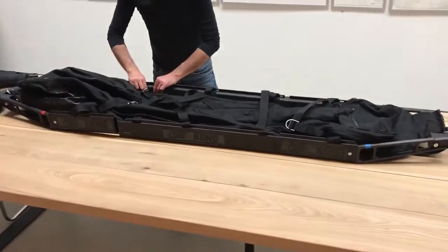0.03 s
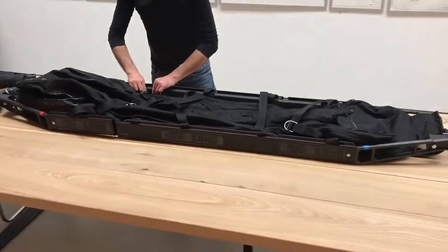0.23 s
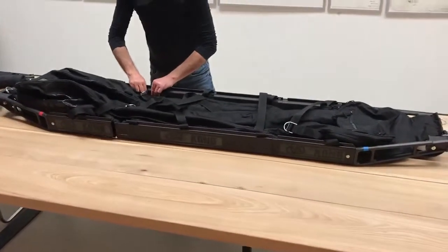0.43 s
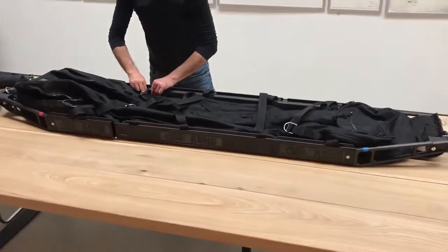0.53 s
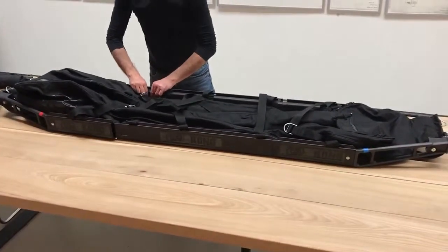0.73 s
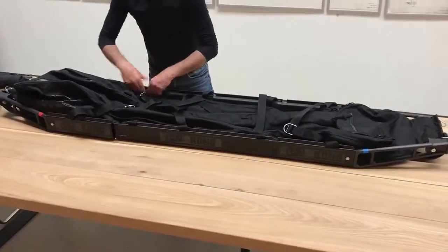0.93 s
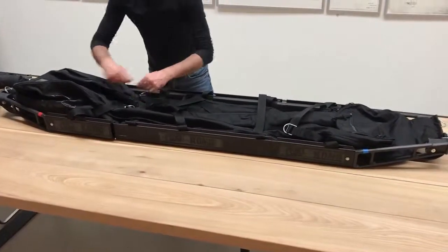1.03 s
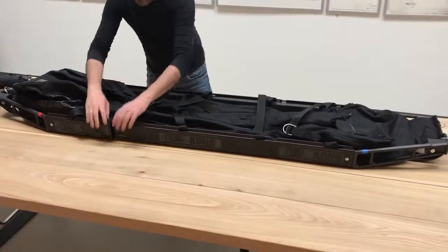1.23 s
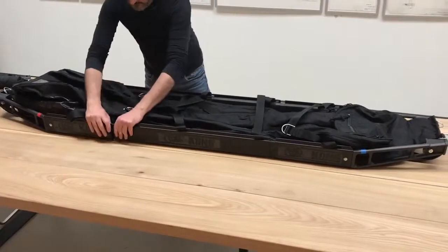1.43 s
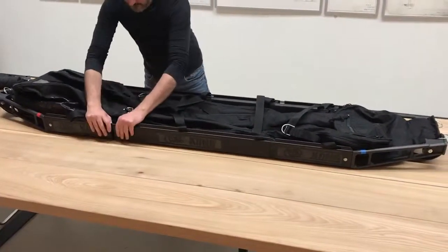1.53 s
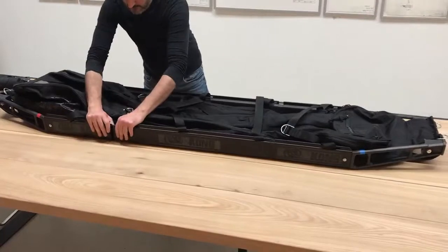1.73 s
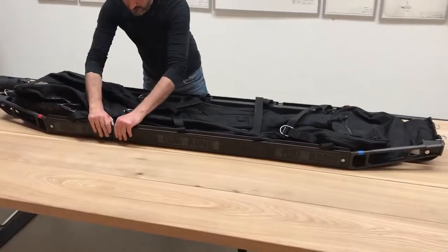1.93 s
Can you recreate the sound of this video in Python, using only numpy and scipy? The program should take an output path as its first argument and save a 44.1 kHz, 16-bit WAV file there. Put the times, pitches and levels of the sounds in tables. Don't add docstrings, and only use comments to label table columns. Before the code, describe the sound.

Metal and plastic stretcher parts knock and rattle on a tabletop in a bare, echoing room.

```python
import sys
import numpy as np
from scipy import signal
from scipy.io import wavfile

SR = 44100
rng = np.random.default_rng(int(sys.argv[2]) if len(sys.argv) > 2 else 0)


def transcribe(signal):
    frames = np.atleast_2d(signal).T
    limited = np.clip(frames, -1, 1)
    pcm = np.round(limited * 32767).astype(np.int16)
    wavfile.write(sys.argv[1], SR, pcm)


def boost(x):
    u = np.asarray(x, float) / 20
    return 10 ** u


N = 88200


def at_hz(points, hz):
    point_hz, value = np.transpose(points)
    return np.interp(np.log(np.maximum(hz, 1)), np.log(point_hz), value)


def rms_one(x):
    return x / np.sqrt(np.mean(x ** 2) + 1e-20)


def add(out, start_s, x):
    i = int(start_s * SR)
    out[i:i + len(x)] += x[:max(N - i, 0)]


def filtered(x, order, hz, kind):
    return signal.sosfilt(signal.butter(order, hz, kind, fs=SR, output="sos"), x)


def ring(clicks, hz, t60_s):
    r = boost(-60 / (t60_s * SR))
    w = 2 * np.pi * hz / SR
    return signal.lfilter([0, np.sin(w)], [1, -2 * r * np.cos(w), r * r], clicks + 1e-18)


def drift(rate_hz):
    step = 40
    r = np.exp(-2 * np.pi * rate_hz * step / SR)
    slow = signal.lfilter([1], [1, -2 * r, r * r], rng.standard_normal(N // step + 2002))
    slow = rms_one(slow[2000:])
    return np.interp(np.arange(N) / step, np.arange(len(slow)), slow)


def bands(white):
    edges = 22 * 2 ** np.arange(0, 9.9, 0.5)
    for k, (low, high) in enumerate(zip(edges, edges[1:])):
        yield np.sqrt(low * high), filtered(white[k % 2], 2, [low, high], "band")


def banded_noise(spectrum, patchy_db, rate_hz):
    together = drift(rate_hz)
    out = np.zeros(N)
    for hz, noise in bands(rng.standard_normal((2, N))):
        out += boost(at_hz(spectrum, hz) + patchy_db * (together + drift(7.9))) * noise
    return rms_one(out)


def chatter(length_s, per_s, size=4000):
    t = np.arange(size) / SR / max(length_s, 5e-4)
    spread_db = 3.0
    sizes = boost(spread_db * np.minimum(rng.exponential(1, size), 4)) * rng.choice([-1, 1], size)
    hits = (rng.random(size) < per_s / SR) | (t == 0)
    gather = np.minimum(0.7 + t / 0.076, 1)
    x = sizes * hits * gather * np.exp(-t ** 2)
    return x / np.sqrt(np.sum(x ** 2) + 1e-20)


# hz [Hz], level_db [dB]
FLOOR_SPECTRUM = [(15, -58), (25, -9), (48, 23.5), (170, -33), (301, 10), (384, -1), (545, -21), (714, -20),
                  (7500, -38), (10500, -50), (16000, -55)]


def room_tone():
    return boost(-44.5 - 4) * banded_noise(FLOOR_SPECTRUM, patchy_db=3.5, rate_hz=1.2)


# time_s [s], level_db [dB]
HAND_MOVES = [(0.0, -43.5), (0.15, -38.5), (0.32, -31.5), (0.451, -41), (0.62, -23), (0.75, -26.5),
              (0.8, -22), (0.96, -32), (1.39, -41), (1.63, -40), (1.81, -35.5), (2.0, -45)]
# hz [Hz], level_db [dB per Hz]
CLOTH_SPECTRUM = [(50, -1.5), (90, -3.5), (300, 2), (550, -6.5), (900, -8.5), (1500, -12), (4500, -26.5),
                  (16000, -48)]


def cloth():
    time_s, level_db = np.transpose(HAND_MOVES)
    motion_db = np.interp(np.arange(N) / SR, time_s, level_db) - 3.5
    return boost(motion_db) * banded_noise(CLOTH_SPECTRUM, patchy_db=1.1, rate_hz=12.0)


def webbing():
    start_s, length_s, level_db = 1.47, 0.41, -66
    t = (np.arange(N) / SR - start_s) / length_s
    hiss = rms_one(filtered(rng.standard_normal(N), 2, 12000, "high"))
    fade = np.clip(12 * np.minimum(t, 1 - t), 0, 1)
    return boost(level_db + 2.5 * drift(9.5)) * fade * hiss


# hz [Hz], t60_s [s]
ROOM_T60 = [(60, 1.2), (200, 1.2), (420, 1.6), (600, 1.6), (840, 1.05), (7500, 1.0), (9800, .45),
            (16000, .25)]
# hz [Hz], level_db [dB]
ROOM_COLOUR = [(60, 10), (150, -1.5), (210, -2), (420, 6), (600, 7.5), (840, 0), (3000, 0), (16000, -1.5)]


def room(x):
    late_db, early_db, early_t60_s, gap_s = -6.5, -12.5, 0.039, 0.0024
    t = np.arange(N) / SR
    early = boost(early_db - 60 * t / early_t60_s) / np.sqrt(early_t60_s * SR / 14)
    response = np.zeros(N)
    for hz, noise in bands(rng.standard_normal((2, N))):
        decay = boost(-60 * t / at_hz(ROOM_T60, hz))
        late = boost(late_db + at_hz(ROOM_COLOUR, hz)) * decay / np.sqrt(np.sum(decay ** 2))
        response += noise * (late + early)
    response *= np.clip(t / gap_s - 1, 0, 1)
    return signal.fftconvolve(x, response)[:N]


# start_s [s], peak_db [dB], length_s [s]
LATCH_CLICKS = [(1.616, -34, 0.011), (1.669, -27, 0.008), (1.688, -22, 0.004), (1.692, -18, 0.0029),
                (1.6975, -19, 0.0015), (1.707, -27, 0.008), (1.727, -38, 0.0043), (1.741, -34.5, 0.01),
                (1.76, -34, .02), (1.803, -35, .015), (1.84, -38, .03), (1.9, -40, .03)]
# pitch_hz [Hz], level_db [dB], t60_s [s]
SHELL_MODES = [(880, 0.5, 0.017), (941, -2, 0.034), (1074, -4, 0.036), (1340, 4.5, 0.014),
               (1520, 6.5, 0.011), (1750, 0, 0.012), (1918, -2, 0.016), (2810, 0, 0.01)]


def latch():
    clicks, scrape = np.zeros(N), np.zeros(N)
    for start_s, peak_db, length_s in LATCH_CLICKS:
        add(clicks, start_s, boost(peak_db - 0.5) * chatter(length_s, 2500))
    slide_end_s, slide_s, slide_db, grit_db = 1.692, 0.02, -23, -12
    slide = boost(slide_db) * chatter(slide_s, 4000)[::-1]
    add(scrape, slide_end_s - len(slide) / SR, slide)
    out = boost(grit_db + 21) * filtered(scrape, 1, [2000, 6000], "band")
    push = filtered(clicks + scrape, 2, 2600, "low")
    for k, (pitch_hz, level_db, t60_s) in enumerate(SHELL_MODES):
        out += (-1) ** k * boost(level_db) * ring(push, pitch_hz, t60_s)
    return out


WAVER_DB, WAVER_HZ = 4, 12.0
# start_s [s], level_db [dB], pitch_hz [Hz], t60_s [s]
PIN_RINGS = [(.533, -33, 4150, .05), (.585, -17, 1437, .055), (.584, -26, 3822, .14),
             (.806, -14, 3892, .045), (.806, -19, 2705, .035), (.808, -24, 4748, .05),
             (.827, -25, 4748, .12), (.808, -35, 8425, .2), (.864, -34, 6650, .65), (.778, -37, 8425, .02),
             (1.70, -29, 200, .2), (.162, -44, 4250, .1), (.737, -33, 5150, .05), (.623, -29, 8430, .05),
             (.638, -36, 7360, .15), (1.694, -37, 8950, .03), (1.6925, -18, 3950, .018),
             (1.6925, -19, 4800, .018), (1.617, -30, 3450, .018), (.852, -37, 5570, .15),
             (1.621, -30, 960, .04), (.727, -29, 3500, .012)]


def pins():
    out = np.zeros(N)
    click = np.arange(SR // 2) == 0
    for start_s, level_db, pitch_hz, t60_s in PIN_RINGS:
        waver_db = WAVER_DB * min(3 * t60_s, 1) * drift(WAVER_HZ)[:len(click)]
        add(out, start_s, boost(level_db + waver_db) * ring(click, pitch_hz, t60_s))
    return out


# pitch_hz [Hz], level_db [dB], t60_s [s]
TUBE_MODES = [(2708, -10, .4), (3892, -14, .3), (4140, -13, .3), (4746, -7, .35), (5053, -14, 1.1),
              (5560, -12, 1.1), (5890, -10, .3), (6648, -13, 1.1), (7359, -10, 1.3), (8430, -6, .2)]
# start_s [s], level_db [dB]
TUBE_STRIKES = [(0.159, -71), (0.236, -73), (0.354, -60), (0.586, -49), (0.617, -40), (0.73, -52.5),
                (0.808, -46.5), (0.827, -44), (.864, -57.5), (1.693, -65)]


def tubes():
    start_s, strike_db = np.transpose(TUBE_STRIKES)
    twins = [(hz * 1.003, level_db + 2.5, t60_s) for hz, level_db, t60_s in TUBE_MODES]
    low_hz, high_hz, shimmer_db, shimmer_t60_s = 2004, 9000, -7, 0.28
    weak = [(low_hz * (high_hz / low_hz) ** a, shimmer_db, shimmer_t60_s * (0.33 + b))
            for a, b in rng.random((90, 2))]
    modes = list(TUBE_MODES) + twins + weak
    spread_db = rng.normal(0, 2, (len(start_s), len(modes)))
    out = np.zeros(N)
    for k, (pitch_hz, level_db, t60_s) in enumerate(modes):
        clicks = np.zeros(N)
        clicks[(start_s * SR).astype(int)] = boost(strike_db + level_db + spread_db[:, k]) * (-1) ** k
        tone = ring(clicks, pitch_hz, t60_s)
        if k < 2 * len(TUBE_MODES):
            tone = tone * boost(WAVER_DB * drift(WAVER_HZ))
        out += tone
    return out


# start_s [s], peak_db [dB], hardness_hz [Hz], boom_db [dB]
THUDS = [(.139, -31, 700, 2), (0.223, -19, 463, 1.5), (0.247, -18.5, 880, 1), (0.342, -18, 480, -13),
         (0.381, -22, 506, 8.5), (0.5747, -5.5, 810, -4.5), (.585, -12, 1260, -15), (.594, -13.5, 1120, -2),
         (.610, -18.5, 720, 9), (.773, -9, 950, -4.5), (.780, -16.5, 1010, -11), (.812, -12.5, 700, 2),
         (.845, -16.5, 731, -1.5), (1.70, -21, 690, 0), (1.786, -43, 880, -7), (1.989, -26.5, 700, -5)]
# pitch_hz [Hz], level_db [dB], t60_s [s]
TABLE_MODES = [(86.1, -5, 0.42), (114.2, -10, 0.42), (136.5, -5, 0.2), (540, -15, 0.7), (255, -21, 0.15),
               (325, -0.5, 0.076), (463, -4, 0.084), (592, 0.5, 0.034), (686, -7.5, 0.037), (470, -15, 0.7),
               (1017, 2, 0.031), (1212, 3.5, 0.025), (1560, 1, 0.034), (1605, 10, 0.055)]


def table():
    out = np.zeros(N)
    spread_db = rng.normal(0, 1.5, (len(THUDS), len(TABLE_MODES)))
    for (start_s, peak_db, hardness_hz, boom_db), spread_row in zip(THUDS, spread_db):
        push = np.zeros(SR // 2)
        push[0] = boost(peak_db - 17.0)
        push[int(0.001887 * SR)] = -2 * push[0]
        push = filtered(push, 2, np.clip(hardness_hz, 100, 8000), "low")
        thud = np.zeros(len(push))
        for (pitch_hz, level_db, t60_s), mode_db in zip(TABLE_MODES, spread_row):
            gain_db = level_db + mode_db + boom_db * (pitch_hz < 200)
            thud += boost(gain_db) * ring(push, pitch_hz, t60_s)
        add(out, start_s, thud)
    return filtered(out, 4, 68, "high")


# start_s [s], level_db [dB], length_s [s], centre_hz [Hz], top_db [dB]
CLACKS = [(0.051, -35, 0.015, 3700, -11), (0.16, -36, 0.0046, 4200, -1.5), (.156, -26, .014, 1200, -30),
          (.2345, -24, .008, 1200, -30), (.353, -24, .012, 1300, -30), (.726, -19, .006, 1200, -30),
          (0.189, -38.5, .02, 4360, 2), (0.233, -19, 0.017, 3500, -24), (0.257, -34, 0.02, 4000, -2),
          (0.3522, -19, 0.0084, 4300, -0.5), (0.525, -13, 0.02, 1470, -28), (0.53, -20.5, 0.013, 3300, -27),
          (0.575, -15, 0.013, 2960, -30), (0.583, -8, 0.029, 3170, -14), (0.617, -14, 0.0052, 5270, -6),
          (.622, -14.5, .012, 4500, -6), (0.636, -15.5, 0.02, 3900, -26), (0.638, -21, 0.0033, 4450, -22),
          (0.649, -22, 0.0045, 3800, -18), (0.672, -18.5, 0.012, 3350, -16), (0.726, -15, 0.004, 3340, -22),
          (0.731, -16.5, 0.011, 3600, -20), (0.771, -16, .022, 3300, -16), (0.805, -10.5, 0.0081, 5000, 1),
          (.811, -13, .012, 4740, -3), (0.823, -14.5, 0.018, 4360, -3), (0.831, -21, 0.0014, 4450, -8),
          (.8335, -20, .0015, 4250, -16), (0.847, -20, 0.0085, 4720, -10), (1.616, -27.5, 0.0054, 3500, -6),
          (1.675, -29, 0.0043, 3100, -18), (1.691, -19.5, 0.0054, 4480, -5), (1.69, -30, 0.014, 15500, -30),
          (1.699, -19, 0.011, 3700, -12), (1.782, -26.5, 0.0066, 2440, -22),
          (1.985, -35.5, 0.0092, 5400, -12)]


def joints():
    out = np.zeros(N)
    for start_s, level_db, length_s, centre_hz, top_db in CLACKS:
        x = boost(level_db + 19) * chatter(length_s, 5000)
        half_width = 2.0 ** np.array([-0.51, 0.51])
        crack = filtered(x, 2, np.minimum(centre_hz * half_width, 0.45 * SR), "band")
        skirt = boost(-18.5) * filtered(x, 1, [centre_hz / 5, centre_hz * 1.34], "band")
        top = boost(top_db - 14.0) * filtered(x, 2, 8000, "high")
        add(out, start_s, crack + skirt - top)
    return out


def scene():
    frame = table() + joints() + tubes()
    shell = latch()
    rings = pins()
    echo = room(frame + boost(-2) * shell + boost(-6) * rings)
    return (frame + shell + rings + echo + cloth() + room_tone() + webbing())[None]


def low_pass(x):
    return signal.sosfilt(signal.butter(12, 16500, fs=SR, output="sos"), x)


def record(dry):
    x = filtered(dry, 4, 59.6, "high")
    x = 0.58 * np.tanh(x / 0.6)
    mix = signal.sosfilt(signal.cheby2(12, 60, 16400, fs=SR, output="sos"), x)
    return low_pass(mix)


dry = scene()
out = record(dry)
transcribe(out)
```